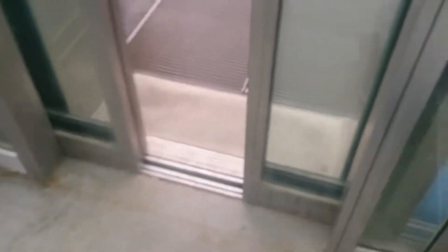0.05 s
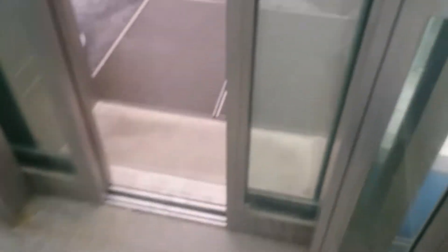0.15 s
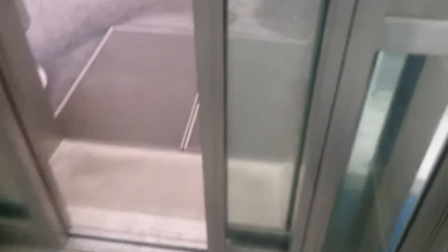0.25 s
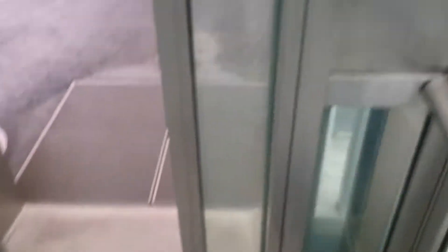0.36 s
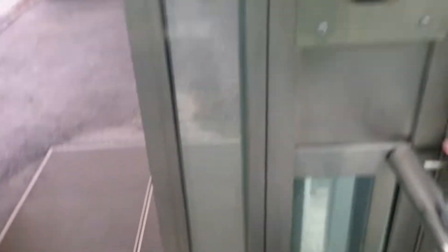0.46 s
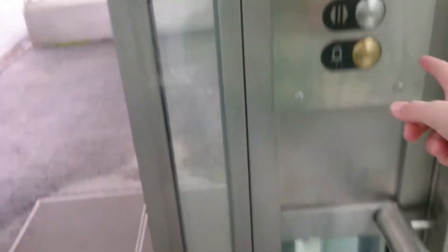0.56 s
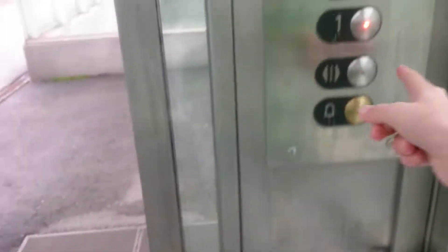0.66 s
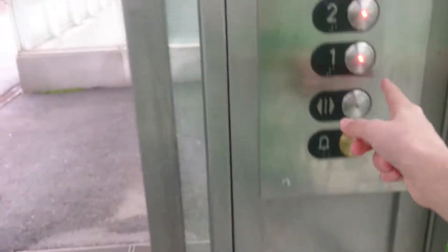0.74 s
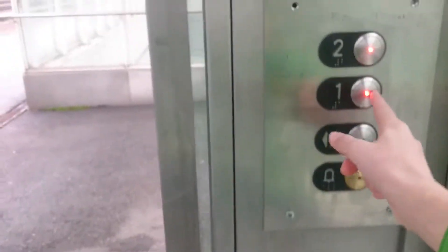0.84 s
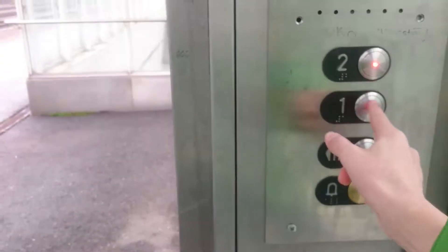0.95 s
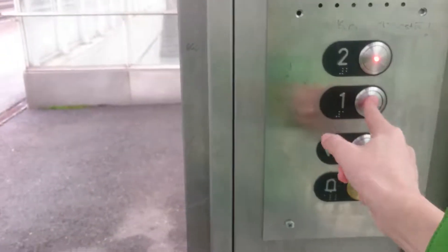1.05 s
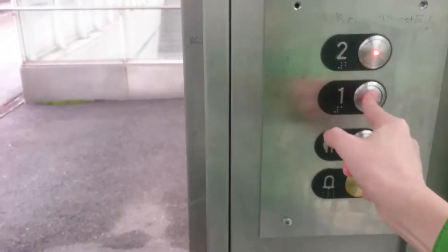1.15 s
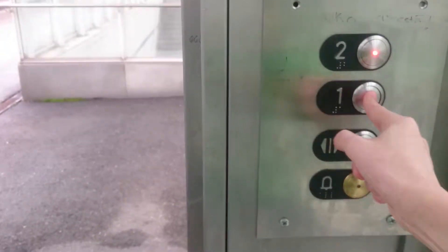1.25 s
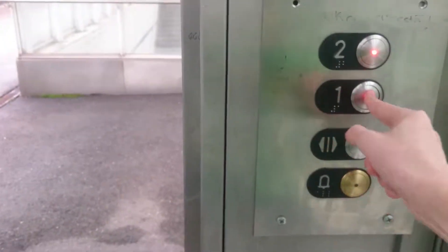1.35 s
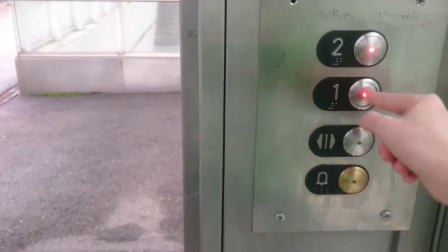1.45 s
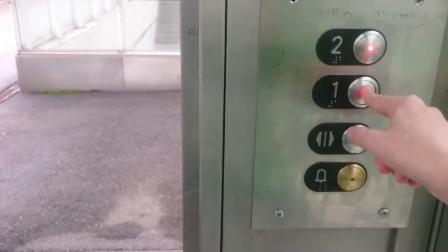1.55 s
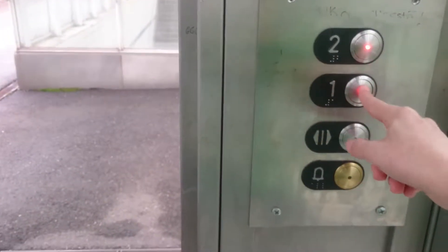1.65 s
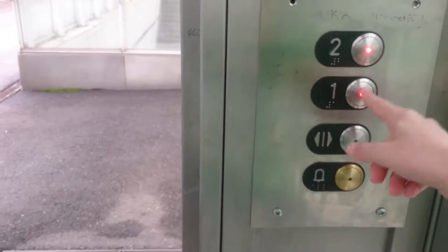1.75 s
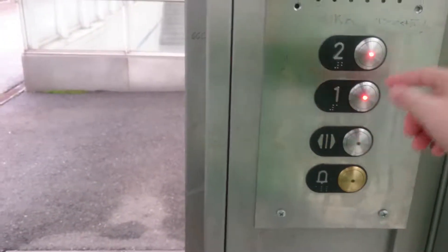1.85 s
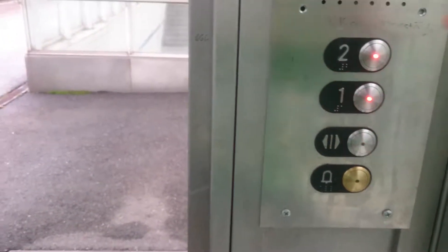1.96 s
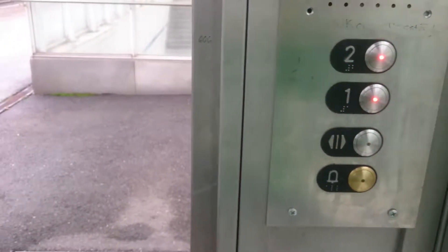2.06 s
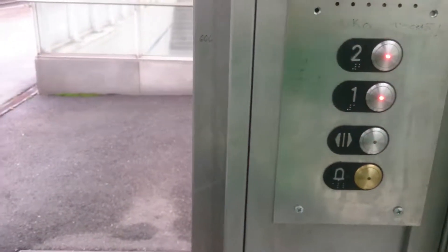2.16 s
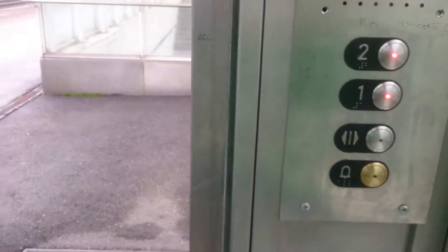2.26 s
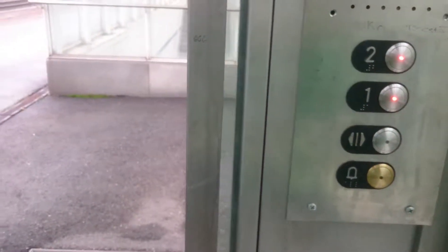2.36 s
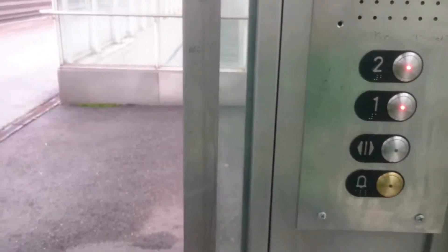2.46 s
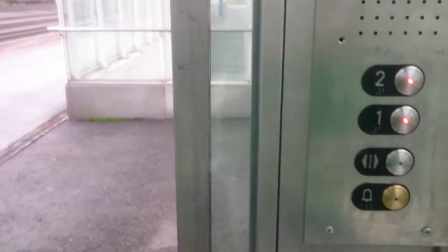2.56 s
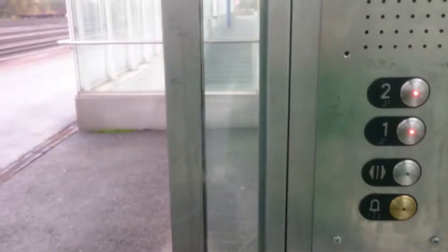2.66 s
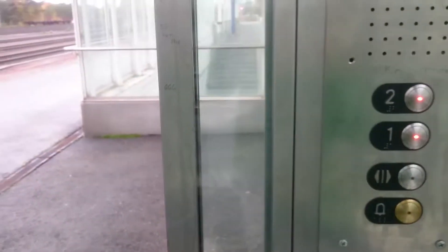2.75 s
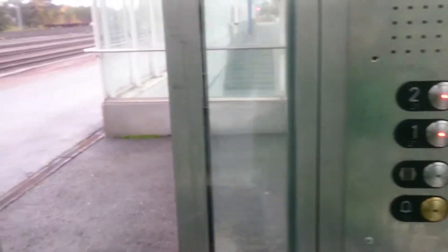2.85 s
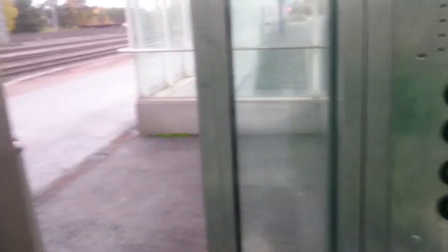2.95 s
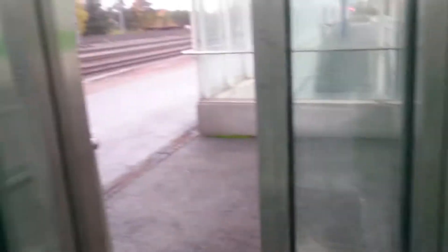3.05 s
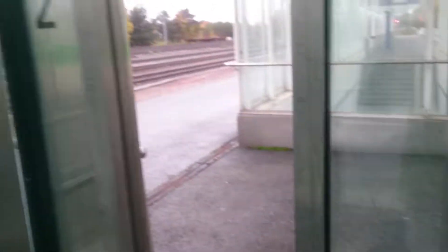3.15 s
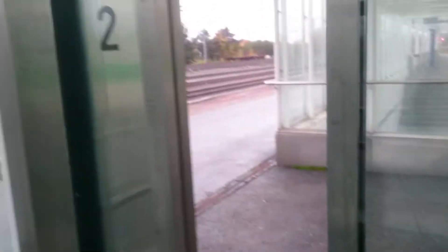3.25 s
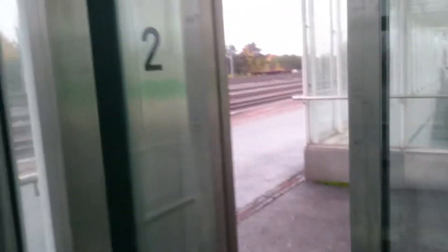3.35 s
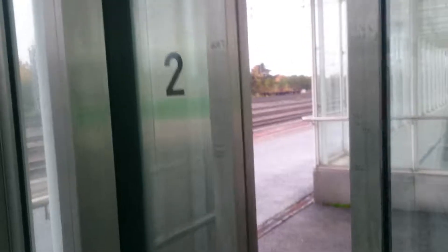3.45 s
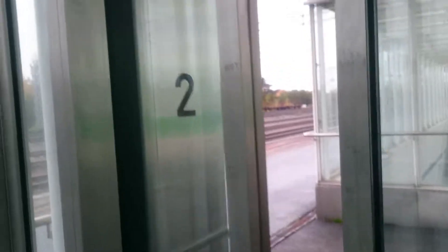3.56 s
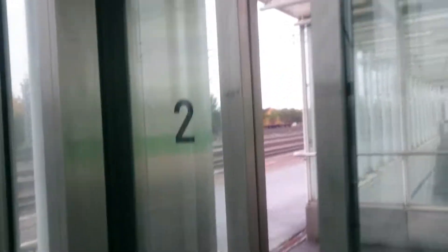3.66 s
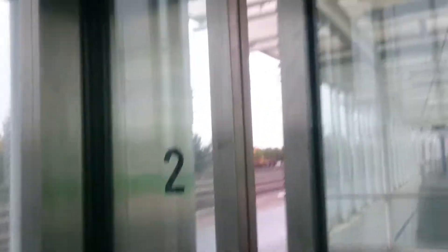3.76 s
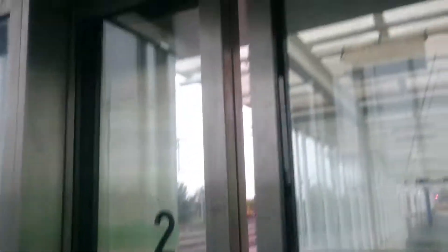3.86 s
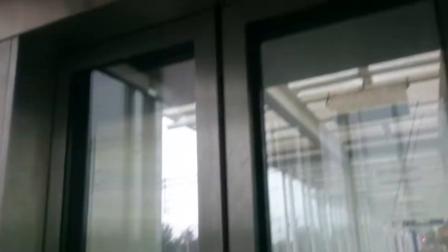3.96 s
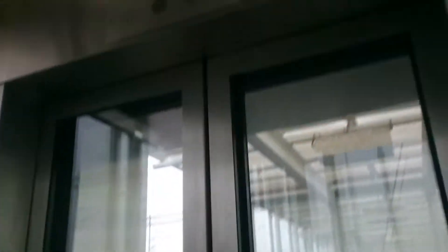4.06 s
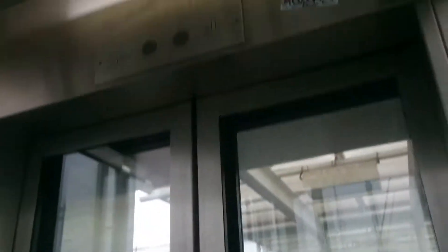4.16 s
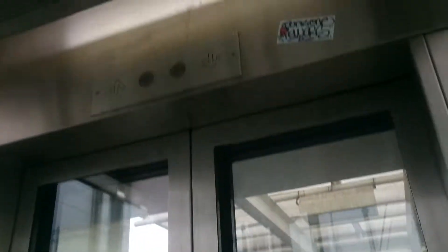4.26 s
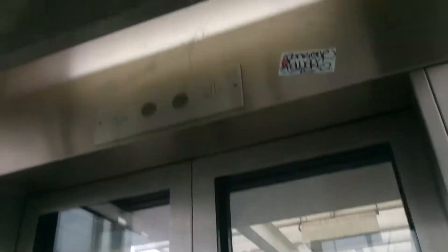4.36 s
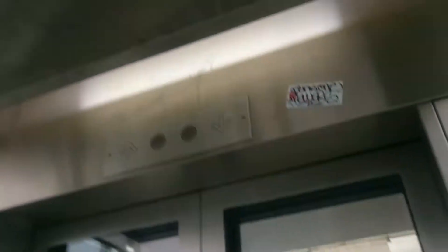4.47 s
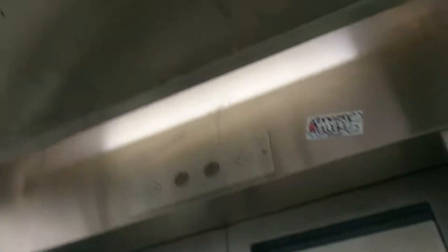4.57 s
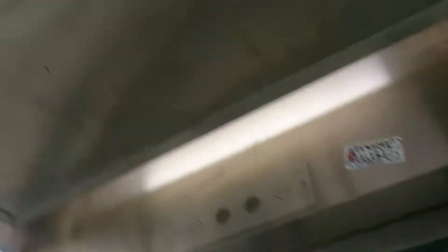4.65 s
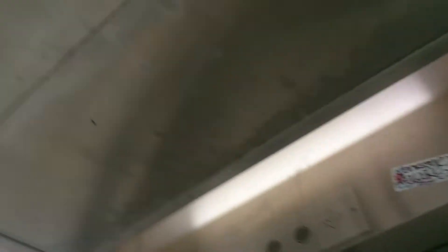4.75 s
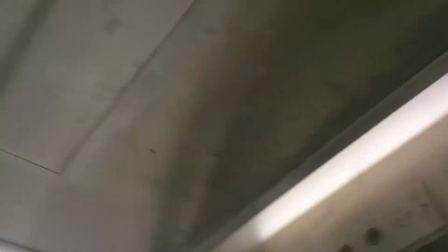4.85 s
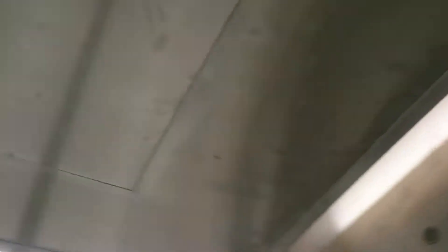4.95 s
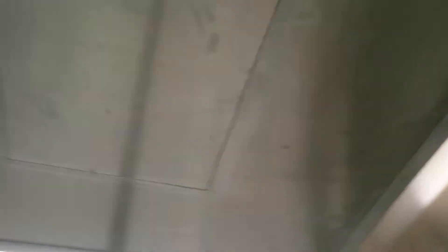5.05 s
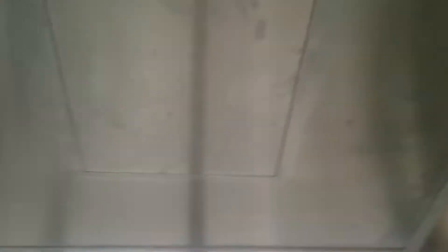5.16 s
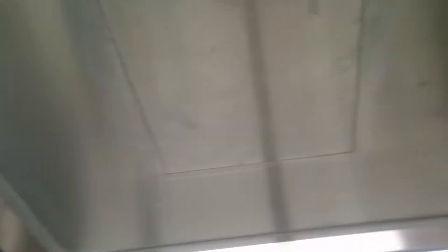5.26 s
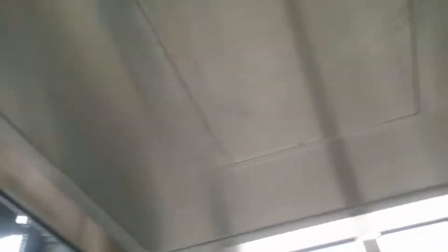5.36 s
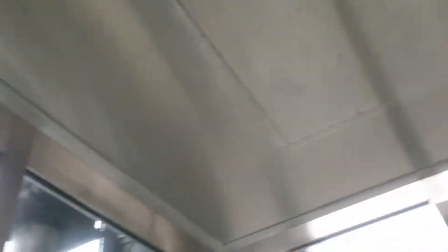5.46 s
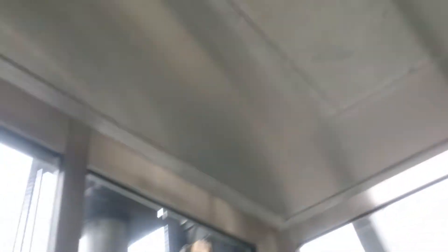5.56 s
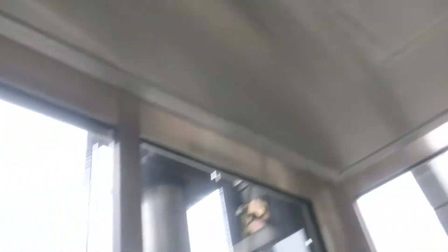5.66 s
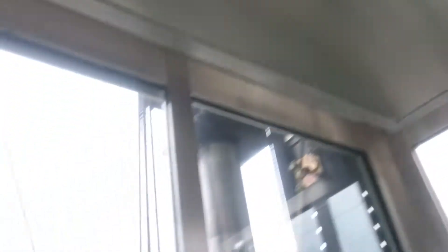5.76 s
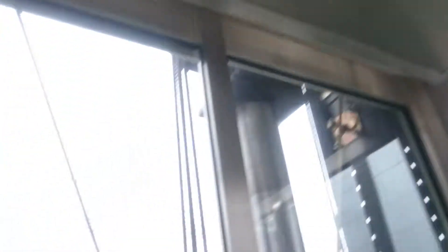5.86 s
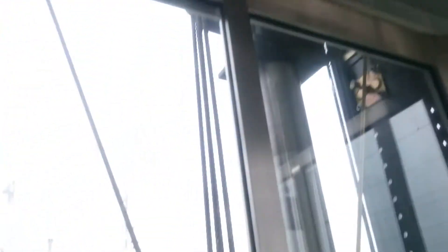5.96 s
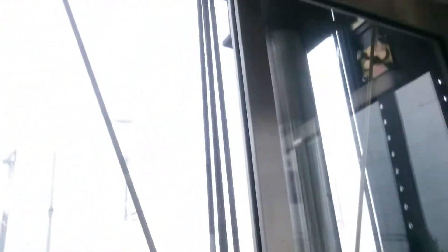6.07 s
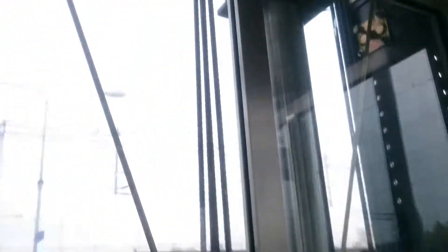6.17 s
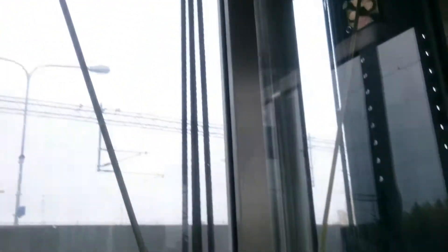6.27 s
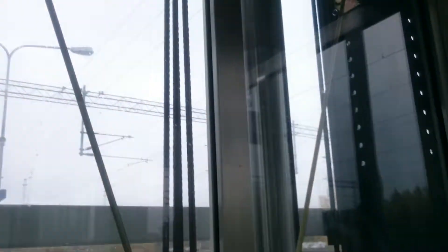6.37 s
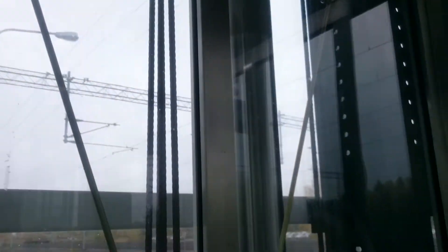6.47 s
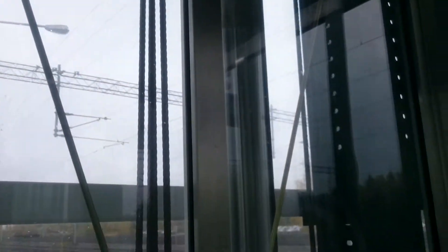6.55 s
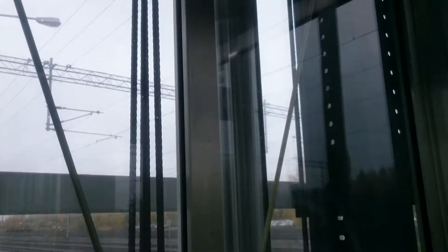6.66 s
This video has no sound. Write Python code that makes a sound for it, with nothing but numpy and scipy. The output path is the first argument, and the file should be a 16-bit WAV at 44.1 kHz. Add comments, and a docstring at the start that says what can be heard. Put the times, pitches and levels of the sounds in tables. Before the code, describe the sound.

Inside a glass lift, a button clicks, sliding doors hiss over a humming drive, then slam shut with a booming bang and rattle into quiet.

```python
"""Inside a glass lift car at an open platform: outside air (shaped noise) comes in, a drive hums (sines).
The door leaves hiss along their brush seals (bright noise and grit), a motor whines, a button clicks.
A latch scrapes, then the leaves slam (noise bursts, ringing modes) and the car booms (resonated noise).
The leaves rattle and shudder to rest, the outside air is shut out and faint air is left in the car.
Two close microphone ports hear the bass in opposite polarity; the slam overloads the recorder."""
import sys
import numpy as np
from scipy import signal
from scipy.io import wavfile

SR = 44100
rng = np.random.default_rng(int(sys.argv[2]) if len(sys.argv) > 2 else 0)


def put_to_file(sound):
    """Save the sound as 16-bit audio at rate SR, in the file named by the first command-line argument."""
    columns = np.atleast_2d(sound).T  # one column per channel
    safe = np.clip(columns, -1, 1)
    whole_steps = np.round(safe * 32767)
    wavfile.write(sys.argv[1], SR, whole_steps.astype(np.int16))


N = 295981
T = np.arange(N) / SR   # seconds
EDGES_HZ = 125 * 2 ** (np.arange(29) / 4)   # quarter-octave band edges
SLAM_S = 4.062

# Strokes of the leaves along their seals. Each row: full speed from in seconds, level in dB,
# rise in seconds per 10 dB, hold in seconds, fall in seconds per 10 dB.
STROKES = [(.37, -33.5, .026, .7, .1), (2.36, -34.5, .2, .78, .1)]
# The seals bind and the hiss surges. Each row: time of the top in seconds, level in dB,
# rise and fall in seconds per 10 dB.
SURGES = [(.5, -32, .12, .12), (.6, -31, .06, .04), (.74, -32, .08, .1), (.92, -26.5, .1, .13),
          (2.38, -31.5, .1, .12), (2.8, -29.5, .07, .08), (2.94, -33, .06, .05), (3.045, -31.5, .04, .12)]
# The leaves shudder against the seals after the slam. Each row: time of the top in seconds,
# level in dB, rise and fall in seconds per 10 dB.
SHUDDERS = [(4.17, -24, .01, .17), (4.39, -26, .05, .1), (4.46, -25, .06, .08), (4.712, -45, .04, .08),
            (4.832, -46.5, .04, .2), (4.978, -36, .055, .07), (5.458, -56, .06, .1)]
# Faint hiss of the seals between strokes. Each row: time in seconds, level in dB, tilt in dB per octave.
RESTING = [(0, -46, -1), (.5, -46, 0), (1.3, -51, -8), (1.79, -53, -12), (2.0, -48, -1), (3.3, -49, -1),
           (4.0, -48, 0), (4.6, -54, 0), (5.1, -54, 0), (5.4, -60, -3), (5.95, -58.5, -2), (6.71, -75, -1)]
# Colour of the seal hiss. Each row: frequency in Hz, relative density in dB per Hz.
SEAL_COLOUR = [(530, -41), (900, -17.5), (1030, -10.5), (1120, -10.5), (1500, -12), (2450, -3),
               (2820, -6.5), (3760, 1), (4200, 2), (4550, -8), (4950, -13), (6050, -8), (7680, -18.5),
               (9740, -11.5), (12300, -21), (14100, -25), (15500, -28)]
STROKE_TILT_DB, SURGE_TILT_DB, SHUDDER_TILT_DB = 4.5, -1.5, -3   # per octave
SLIDE_SIDE_DB, SHUT_SIDE_DB = 6.8, 4.5   # left over right, before and after the slam
GRIT_PER_S, GRIT_DB = 700, -14.5   # in each channel; dB against the seal level
ROLLER_HZ, ROLLER_WIDTH_HZ, ROLLER_DB = 529, 16, -31   # dB against the seal level

# Blows on the metal. Each row: start in seconds, level in dB, rise in seconds, hold in seconds,
# T60 in seconds, thin below in Hz, dull above in Hz, left over right in dB.
BLOWS = [(1.066, -29, .001, .01, 0.17, 1500, 9000, 13), (1.820, -36.5, .001, 0.014, 0.38, 3720, 8000, 6),
         (1.883, -31.5, 0.00059, .005, 0.39, 900, 11000, 7), (4.015, -24, 0.0058, .015, 0.6, 1280, 6360, 6),
         (4.062, -4.8, 0.00083, 0.045, 0.37, 200, 15800, 2),
         (4.354, -33, .001, 0.0092, 0.27, 400, 11000, 1), (4.383, -23, .001, 0.0042, .2, 2500, 12100, 3),
         (4.404, -18, .001, 0.0085, 0.22, 890, 4840, 0),
         (4.447, -25, 0.0012, 0.0094, 0.47, 1500, 12300, -3), (4.821, -35, .002, 0.06, .3, 2200, 4500, 3),
         (5.146, -25.5, 0.032, 0.048, 0.8, 2500, 6200, 2),
         (5.13, -38.5, 0.06, 0.042, 0.64, 5000, 12900, 5.5), (5.44, -51, .004, .03, 0.35, 1490, 4300, 15)]
# Colour of the struck metal. Each row: frequency in Hz, relative density in dB per Hz.
STRUCK_COLOUR = [(88, -47), (150, -24.5), (339, -13.5), (404, 4), (471, -10.5), (630, -10), (860, -6),
                 (1050, -1), (1340, 1), (1940, -4), (2140, 4), (2920, -4.5), (3690, 3), (4750, -7),
                 (9360, -8.5), (15500, -12.5)]
# How long each pitch lasts. Each row: frequency in Hz, share of the blow's T60 as a ratio.
RING_TIME = [(150, 0.5), (500, 1.2), (2000, 0.79), (15000, 0.37)]
# Clearest modes of the struck leaves. Each row: frequency in Hz, peak in dB, T60 in seconds.
LEAF_MODES = [(393, -23.5, 1.4), (403, -27, 1.1), (419, -25, .35), (2117, -21, .3), (3603, -22, .3)]
# Modes of the scraped latch. Each row: frequency in Hz, width in Hz, relative level in dB.
LATCH_MODES = [(1500, 60, -7), (2200, 60, -3), (3170, 70, -1), (3730, 60, 0), (4440, 60, -11),
               (5850, 90, -8)]
# Scrape of the latch. In order: loudest from in seconds, level in dB, rise in seconds per 10 dB,
# hold in seconds, fall in seconds per 10 dB.
LATCH_SWELL = (4.019, -26, .003, .02, .03)
# Sharp ticks. Each row: start in seconds, strength in dB, left over right in dB,
# knock against the tick in dB, knock frequency in Hz.
TICKS = [(.5075, -28, 6, -22, 2500), (1.0660, -21, 0, 3, 3800), (1.821, -40, 6, 4, 6000),
         (1.8830, -30, 9, 9, 1330), (3.7752, -29, 14, -9, 168.5), (4.0625, 1, -6, -19, 2000),
         (4.3539, -28, 5, 8, 2200), (4.3741, -17, 9, -20, 8450), (4.385, -20, 5, 8, 3800)]
KNOCK_CYCLES = 7.3   # T60 of a knock, in its own cycles
# Dull thuds through the frame. Each row: start in seconds, strength in dB, frequency in Hz, T60 in seconds.
THUDS = [(1.072, -32, 242, 0.23), (1.078, -26.5, 120.4, 0.31), (4.066, -16.5, 526, .3),
         (5.452, -41, 60, .16), (5.451, -36, 129, 0.12), (5.735, -36, 54, 0.28)]

# Air modes of the car. Each row: frequency in Hz, width in Hz, relative level in dB.
BOOM_MODES = [(32, 53, -5.5), (52, 11, 3.5), (75, 10, -2), (102, 18, -4), (123.6, 10, -3), (156, 20, -7.5)]
# Panel modes. Each row: frequency in Hz, width in Hz, relative level in dB.
PANEL_MODES = [(200, 65, -6), (239, 68, -7), (322.3, 41, -4), (360, 34, -4), (491, 120, 2.5), (500, 30, 1),
               (606, 150, 4), (756, 26, -3.5), (820, 70, 0.5)]
# Narrow floor mode left ringing by the slam. Each row: frequency in Hz, width in Hz, relative level in dB.
FLOOR_MODE = [(87.5, 2.6, 0)]
# Narrow wall modes left ringing by the slam. Each row: frequency in Hz, width in Hz, relative level in dB.
WALL_MODES = [(243, 5.7, -1), (288, 9.4, -7.5), (340, 7, -3), (398, 7, 0.5), (452, 8, -5), (547, 16, -7)]
# Steady shaking of the car. Each row: time in seconds, boom level in dB, panel level in dB.
TREMBLE = [(0, -53, -47), (.45, -61, -52), (1.5, -66, -55), (2.3, -71, -59), (3.0, -64, -55),
           (4.0, -64, -53), (4.3, -47, -36), (4.5, -49, -38), (4.7, -52, -50), (5.1, -61, -58),
           (5.6, -66, -67), (6.1, -72, -71), (6.71, -81, -74)]
TREMBLE_WAVER_DB, TREMBLE_WAVER_PER_S = 2.5, 5   # spread and rough rate of the waver
# Jolts through the frame. Each row: time of the top in seconds, boom level in dB, panel level in dB,
# fall in seconds per 10 dB.
JOLTS = [(1.13, -54, -47, .12), (3.07, -60, -52, .1), (4.08, -36, -20.5, .06), (4.94, -48, -56, .1),
         (5.45, -58, -66, .1), (5.78, -62, -70, .15), (5.89, -65, -57.5, .12)]
JOLT_RISE_S = .04   # per 10 dB

# Harmonics of the drive hum. Each row: frequency in Hz, left peak in dB, right peak in dB,
# both before the hum level over time.
MAINS = [(100, -52, -59), (200, -52, -55), (300, -53, -54), (400, -46, -54), (500, -62, -63)]
# Hum level over time. Each row: time in seconds, gain in dB.
HUM_LEVEL = [(0, -20), (.55, -18), (.75, 0), (2.2, 0), (3.15, -1), (3.3, -16), (4.0, -30), (6.71, -40)]
# Whine of the door motor. Each row: time in seconds, left peak in dB before it wavers.
WHINE_LEVEL = [(0, -41), (.3, -36.5), (.7, -42), (1.25, -46.5), (1.4, -75), (2.2, -56), (2.5, -45),
               (3.1, -44.5), (4.0, -49), (4.3, -72), (6.71, -84)]
WHINE_HZ, WHINE_CLIMB_HZ_PER_S = 666, 3.5

# Outside air through the doorway. Each row: time in seconds, level in dB, left over right in dB.
DOORWAY = [(0.0, -47, 6), (0.9, -42, 7), (1.3, -44, 6.5), (2.47, -41.5, 6.5), (2.86, -39.5, 2),
           (3.62, -46, 3), (4.07, -51, 0), (4.15, -67, 0), (6.71, -66.5, 2)]
# Colour of the outside air. Each row: frequency in Hz, relative density in dB per Hz.
AIR_COLOUR = [(18, -45), (30, -18), (102, -14), (190, -23), (263, -33.5), (399, -25.5), (443, -18),
              (639, -5), (1050, 2.5), (2360, 3.5), (2910, -9), (3780, -4), (4910, -18), (9680, -28),
              (15500, -37)]
# Colour of the air in the shut car. Each row: frequency in Hz, relative density in dB per Hz.
SHUT_AIR_COLOUR = [(530, -30), (900, -7.5), (1120, -16), (1330, -9), (1520, -9.5), (2200, -3.5), (2390, -2),
                   (3070, -3), (3800, -0.5), (6420, -7), (15500, -22)]
SHUT_MODE_HZ, SHUT_MODE_WIDTH_HZ, SHUT_MODE_DB = 2420, 110, 6

# Short cavities of the microphones, rung by clicks. Each row: frequency in Hz, gain in dB, T60 in seconds.
PORT_RINGS = [(1200, -13.5, 0.001), (3993, 3, 0.0038), (5556, -3, 0.0038), (9400, -1, 0.0042),
              (13500, -11, .0015)]
# Likeness of the two ports. Each row: frequency in Hz, left-right correlation from -1 to 1.
LIKENESS = [(60, -.97), (180, -.95), (550, -0.72), (1650, 0.084), (4970, 0.1), (15000, 0.0)]
# Balance of the two ports. Each row: frequency in Hz, left over right in dB.
PORT_BALANCE = [(300, 0), (400, 4), (700, 1), (1500, 1), (2400, 0.5), (3600, 3), (4600, -8), (6000, 0.5),
                (7500, 1.5), (9000, 6), (10400, -4.5), (12300, -5), (15000, -9)]
# Cavity peaks added to everything. Each row: frequency in Hz, width in Hz, left gain in dB, right gain in dB.
PORT_PEAKS = [(3820, 650, -9.5, -15), (4036, 200, -15.5, -8.5), (10000, 1300, -7.5, -24.5),
              (11000, 2000, -22.5, -6)]
BASS_BALANCE_DB = 3   # left over right, for everything shaken
OVERLOAD = 1.0   # ceiling of the recorder, full scale
RECORDER_HISS_DB, CUTOFF_HZ = -77, 15680


def seals(bands):
    """Brush hiss with grit and rollers; steady strokes are bright, surges and shudders duller."""
    rest_db, rest_tilt_db = in_time(RESTING)
    strokes = together(swell(*row) for row in STROKES)
    surges = together(swell(s, db, rise, 0, fall) for s, db, rise, fall in SURGES)
    shudders = together(swell(s, db, rise, 0, fall) for s, db, rise, fall in SHUDDERS) * (T > SLAM_S)
    rubs = [(amp(rest_db), rest_tilt_db), (strokes, STROKE_TILT_DB),
            (surges, SURGE_TILT_DB), (shudders, SHUDDER_TILT_DB)]
    level = together(gain for gain, _ in rubs)
    # the strongest rub sets the tilt
    tilt_db = sum(gain ** 2 * db for gain, db in rubs) / level ** 2

    # shifted in time, so that the hiss does not copy the outside air
    bands = [(hz, np.roll(band, N // 3, axis=1)) for hz, band in bands if hz > 800]
    hiss = 0
    for hz, band in bands:
        colour_db = at_hz(SEAL_COLOUR, hz) + tilt_db * np.log2(hz / 4000)
        hiss = hiss + amp(colour_db + 1.4 * drift(25)) * band
    hiss = hiss / first_second_std(SEAL_COLOUR, bands)

    rollers = shaken([(ROLLER_HZ, ROLLER_WIDTH_HZ, 0)])   # the hanger rollers sing while a leaf moves
    sizes = amp(5 * np.minimum(rng.exponential(1, (2, N)), 3)) * rng.choice([-1, 1], (2, N))
    grains = sizes * (rng.random(N) < GRIT_PER_S / SR)
    grit = rms_one(port_ring(grains))
    side = pan(np.where(T < SLAM_S, SLIDE_SIDE_DB, SHUT_SIDE_DB))
    return level * side * (hiss + amp(GRIT_DB) * grit + amp(ROLLER_DB) * rollers)


def blows(bands):
    """Metal and glass modes too dense to tell apart: each blow is noise that holds, then dies band by band."""
    out = np.zeros((2, N))
    even = first_second_std(STRUCK_COLOUR, bands)
    t = T[:SR // 2]
    for s, db, rise, hold, t60, thin_hz, dull_hz, side_db in BLOWS:
        start = round(s * SR)
        for hz, band in bands:
            band_t60 = t60 * at_hz(RING_TIME, hz)
            shape = np.minimum(t / rise, 1) * amp(-60 * np.maximum(t - hold, 0) / band_t60)
            thin_and_dull = 1 / (1 + (thin_hz / hz) ** 4) / (1 + (hz / dull_hz) ** 6)
            gain = amp(db + at_hz(STRUCK_COLOUR, hz)) * thin_and_dull / even
            noise = band[:, N - start - len(t):N - start]   # later blows draw on earlier noise
            out[:, start:start + len(t)] += gain * shape * pan(side_db) * noise
    return out


def latch_and_leaves():
    """The latch scrapes its own modes just before the slam, which rings the leaf modes in both ports alike."""
    out, size = np.zeros((2, N)), SR // 5
    start = round(LATCH_SWELL[0] * SR) - size // 10
    out[:, start:start + size] = swell(*LATCH_SWELL)[start:start + size] * shaken(LATCH_MODES, size=size)
    blow = 1.0 * (np.arange(N) == round(SLAM_S * SR))
    return out + sum(amp(db) * ring(blow, hz, t60) for hz, db, t60 in LEAF_MODES)


def ticks():
    """Single hard contacts, hardly ringing, each with a short knock of the part hit and little below it."""
    out, size = np.zeros((2, N)), SR // 10
    for s, db, side_db, knock_db, knock_hz in TICKS:
        start = round(s * SR)
        click = amp(db) * pan(side_db) * (np.arange(size) == 0)
        knock = amp(knock_db) * ring(click, knock_hz, KNOCK_CYCLES / knock_hz)
        low_cut = signal.butter(2, min(knock_hz / 2, 800), "high", fs=SR, output="sos")
        out[:, start:start + size] += signal.sosfilt(low_cut, port_ring(click) + knock)
    return out


def thuds():
    """Soft low blows, opposite in the two ports; each push lasts about a cycle."""
    out = np.zeros(N)
    for s, db, hz, t60 in THUDS:
        start, push, cycle = round(s * SR), np.zeros(SR // 2), round(SR / hz)
        push[:cycle] = np.hanning(cycle) * 3.6 * hz / SR
        out[start:start + SR // 2] += amp(db) * ring(push, hz, t60)
    return out * [[1], [-.7]]


def car():
    """Random shaking excites the air modes of the car and its panels; the slam leaves narrow modes ringing."""
    out = 0
    for k, (modes, steady_db) in enumerate(zip((BOOM_MODES, PANEL_MODES), in_time(TREMBLE))):
        gains = [amp(steady_db + TREMBLE_WAVER_DB * drift(TREMBLE_WAVER_PER_S))]
        for s, *levels_db, fall in JOLTS:
            audible = (T > SLAM_S) | (s < SLAM_S)   # later jolts keep quiet until the slam
            gains.append(swell(s, levels_db[k], JOLT_RISE_S, 0, fall) * audible)
        out = out + together(gains) * shaken(modes)

    floor_gain = swell(4.3, -39.5, rise=.12, hold=.45, fall=.1)
    wall_ring = swell(4.1, -31, rise=.015, hold=.1, fall=.23)
    wall_tail = swell(4.3, -52, rise=.1, hold=.3, fall=.8)
    start = round(SLAM_S * SR)
    for modes, gain in ((FLOOR_MODE, floor_gain), (WALL_MODES, np.hypot(wall_ring, wall_tail))):
        out[:, start:] += gain[start:] * shaken(modes, size=N - start)
    return out


def drive():
    """Hum at multiples of twice the mains rate, opposite in the ports, and a wavering whine out of step."""
    hum = 0
    for hz, left_db, right_db in MAINS:
        hum = hum + amp([[left_db], [right_db]]) * np.sin(2 * np.pi * (hz * T + rng.random()))
    hum_db, = in_time(HUM_LEVEL)
    whine_db, = in_time(WHINE_LEVEL)
    whine_hz = WHINE_HZ + WHINE_CLIMB_HZ_PER_S * T + 14 * drift(30)
    phase = 2 * np.pi * np.cumsum(whine_hz) / SR
    whine = amp(whine_db + 3.5 * drift(20)) * np.array([np.sin(phase), 0.47 * np.sin(phase - 2.3)])
    return amp(hum_db) * hum * [[1], [-1]] + whine


def outside_air(bands):
    """Far traffic and wind as smooth, slowly patchy noise; a swell of it is the slam back from the shaft."""
    level_db, side_db = in_time(DOORWAY)
    air = mid_one(sum(amp(at_hz(AIR_COLOUR, hz) + 1.6 * drift(12)) * band for hz, band in bands))
    echo = swell(4.27, -39, rise=.03, hold=.2, fall=.17)
    return (amp(level_db) * pan(side_db) + echo) * air


def shut_air(bands):
    """Faint noise of the air left once the leaves have met; a slot in the doors favours one pitch."""
    # played backwards, so that it does not copy the outside air
    air = sum(amp(at_hz(SHUT_AIR_COLOUR, hz)) * band[:, ::-1] for hz, band in bands if hz > 800)
    air = air + amp(SHUT_MODE_DB) * resonate(air, SHUT_MODE_HZ, SHUT_MODE_WIDTH_HZ)
    return swell(4.7, -52.5, rise=.25, hold=0, fall=1.3) * pan(4.2) * mid_one(air)


def shaken(modes, size=N):
    """Noise in a set of modes, every second one flipped, heard through the ports."""
    white = rng.standard_normal((2, size))
    body = 0
    for k, (hz, width, db) in enumerate(modes):
        mode = resonate(ports(white, hz), hz, width)
        body = body + amp(db) / np.sqrt(width) * mode * (-1) ** k
    return mid_one(body * pan(BASS_BALANCE_DB))


def noise_bands():
    """Quarter-octave bands of stereo noise, as (centre Hz, sound); neighbours are unrelated."""
    white = rng.standard_normal((2, 2, N))
    bands = []
    for k, (low, high) in enumerate(zip(EDGES_HZ, EDGES_HZ[1:])):
        centre = np.sqrt(low * high)
        band_pass = signal.butter(2, [low, high], "band", fs=SR, output="sos")
        bands.append((centre, ports(signal.sosfilt(band_pass, white[k % 2]), centre)))
    return bands


def ports(pair, hz):
    """Mix two unrelated signals to the likeness of the ports at this pitch, then set their balance."""
    alike = np.clip(at_hz(LIKENESS, hz), -.97, .97)
    difference = np.sqrt((1 - alike) / (1 + alike)) * pair[1] * [[1], [-1]]
    return (pair[0] + difference) * pan(at_hz(PORT_BALANCE, hz))


def port_ring(clicks):
    """A click rings the short cavities in front of the microphones."""
    return sum(amp(db) * ring(clicks, hz, t60) * pan(at_hz(PORT_BALANCE, hz)) for hz, db, t60 in PORT_RINGS)


def resonate(x, hz, width):
    """A two-pole resonance with a gain of about 1 on top."""
    r = np.exp(-np.pi * width / SR)
    return signal.lfilter([(1 - r * r) / 2, 0, (r * r - 1) / 2], [1, -2 * r * np.cos(2 * np.pi * hz / SR), r * r], x)


def ring(clicks, hz, t60):
    """A unit click sets a dying sine of starting height 1 ringing."""
    r, w = amp(-60 / (t60 * SR)), 2 * np.pi * hz / SR
    return signal.lfilter([0, np.sin(w)], [1, -2 * r * np.cos(w), r * r], clicks + 1e-18)


def swell(s, db, rise, hold, fall):
    """Gain that climbs to its level at s, holds and dies; rise and fall are the times for 10 dB."""
    return amp(db - 10 * np.maximum(s - T, 0) / rise - 10 * np.maximum(T - s - hold, 0) / fall)


def together(gains):
    """Unrelated shakings add as powers."""
    return np.sqrt(sum(g ** 2 for g in gains))


def drift(rate):
    """Slow random wander of spread about 1, low-passed near this rate in Hz."""
    step = 40   # samples between drawn points
    r = np.exp(-2 * np.pi * rate * step / SR)
    slow = signal.lfilter([1], [1, -2 * r, r * r], rng.standard_normal(N // step + 2002))[2000:]
    return np.interp(np.arange(N) / step, np.arange(len(slow)), rms_one(slow))


def pan(db):
    """Left and right gains for a left-right difference."""
    return amp(np.array([db / 2, -db / 2]).reshape(2, -1))


def amp(db):
    """Turn dB into gain."""
    return np.exp(np.asarray(db) * (np.log(10) / 20))


def rms_one(x):
    """Scale to rms 1."""
    return x / np.sqrt(np.mean(x ** 2) + 1e-20)


def mid_one(x):
    """Scale so that the mean of both channels has rms 1."""
    return x / np.sqrt(np.mean(x.mean(axis=0) ** 2))


def first_second_std(colour, bands):
    """Spread of the coloured noise over its first second, for levelling."""
    return np.std(sum(amp(at_hz(colour, hz)) * band[:, :SR] for hz, band in bands))


def in_time(rows):
    """Table columns as curves over time."""
    s, *columns = np.vstack(rows).T
    return [np.interp(T, s, c) for c in columns]


def at_hz(points, hz):
    """Read a spectrum on a log-frequency axis."""
    table = np.array(points)
    return np.interp(np.log(hz), np.log(table[:, 0]), table[:, 1])


def scene():
    """All sources at the two ports."""
    bands = noise_bands()
    doors = seals(bands) + blows(bands) + latch_and_leaves() + ticks() + thuds()
    return doors + car() + drive() + outside_air(bands) + shut_air(bands)


def record(dry):
    """Each port has its cavity peaks; loud peaks clip with a tight knee; faint hiss; the top is cut."""
    peaks = 0
    for hz, width, left_db, right_db in PORT_PEAKS:
        peaks = peaks + amp([[left_db], [right_db]]) * resonate(dry, hz, width)
    dry = dry + peaks
    clipped = dry / (1 + np.abs(dry / OVERLOAD) ** 6) ** (1 / 6)
    fade = np.clip((6.6 - T) / .3, 0, 1)   # the hiss fades at the end
    hiss = amp(RECORDER_HISS_DB) * rng.standard_normal((2, N)) * fade
    cut = signal.ellip(14, .3, 75, CUTOFF_HZ, fs=SR, output="sos")
    return np.clip(signal.sosfilt(cut, clipped + hiss), -1, 1)


dry = scene()
out = record(dry)
put_to_file(out)
```